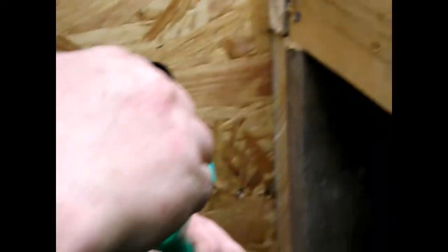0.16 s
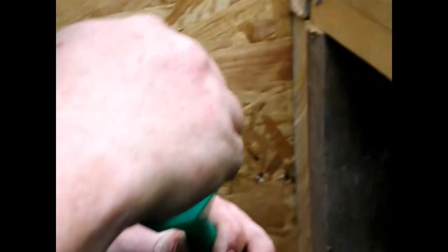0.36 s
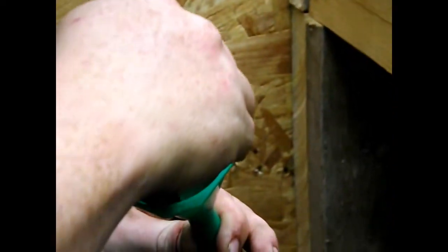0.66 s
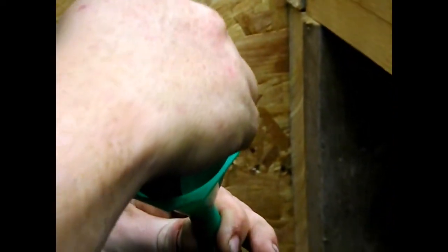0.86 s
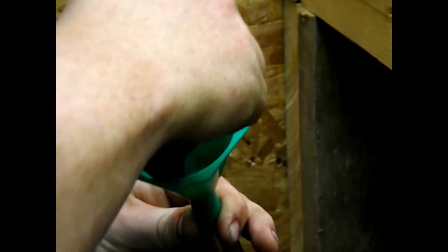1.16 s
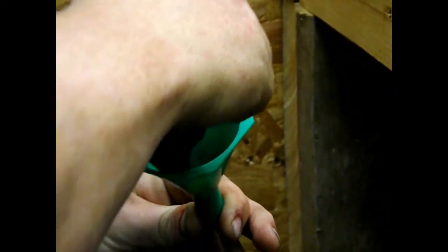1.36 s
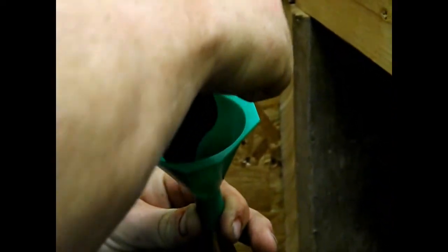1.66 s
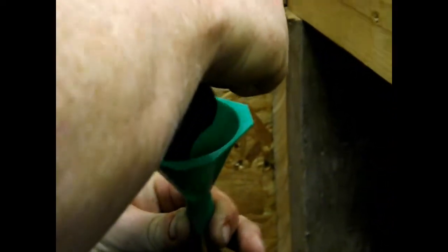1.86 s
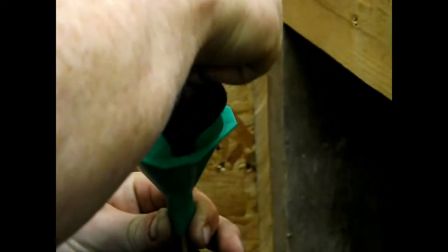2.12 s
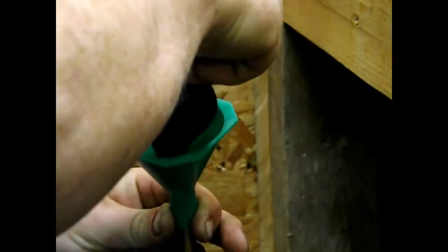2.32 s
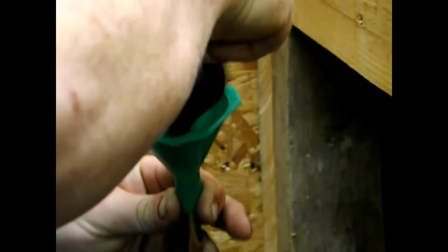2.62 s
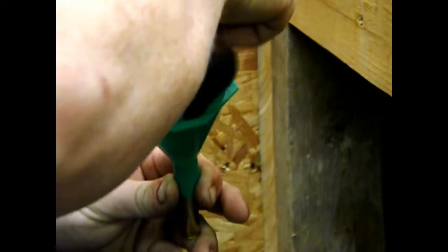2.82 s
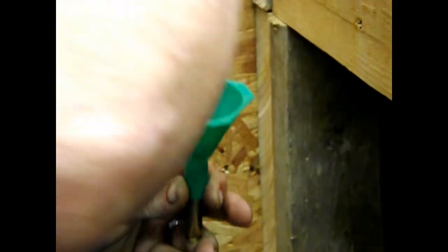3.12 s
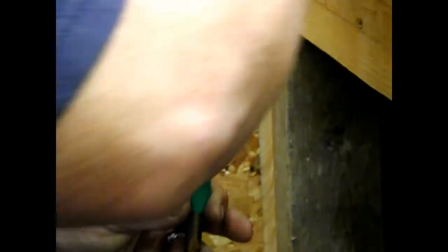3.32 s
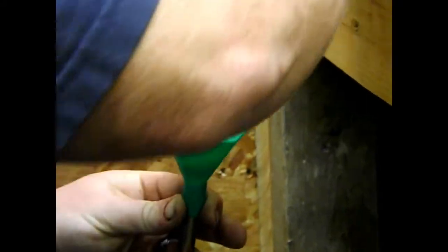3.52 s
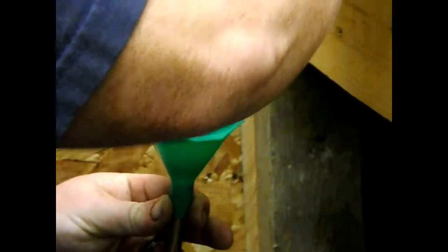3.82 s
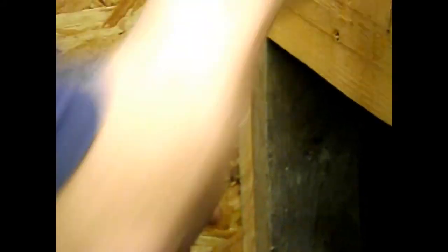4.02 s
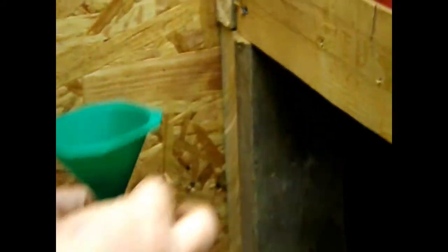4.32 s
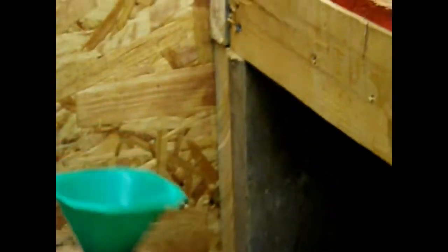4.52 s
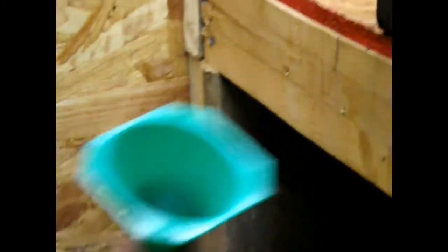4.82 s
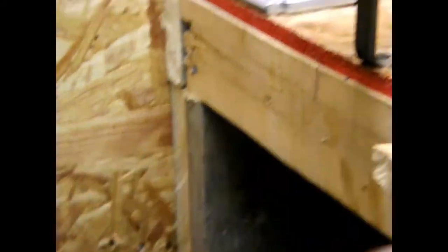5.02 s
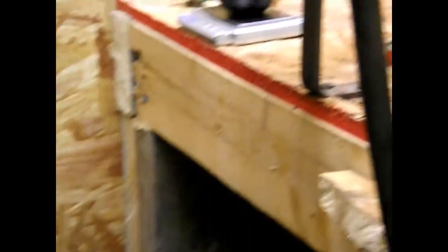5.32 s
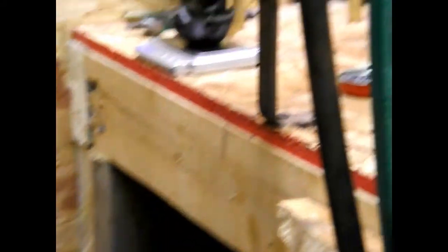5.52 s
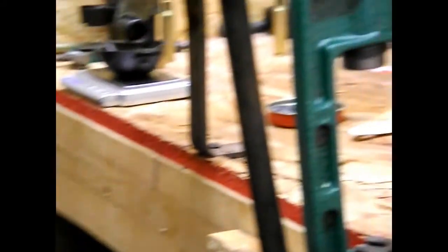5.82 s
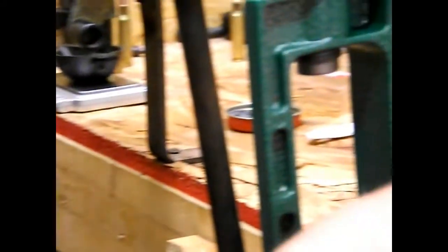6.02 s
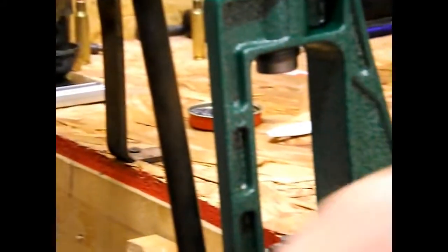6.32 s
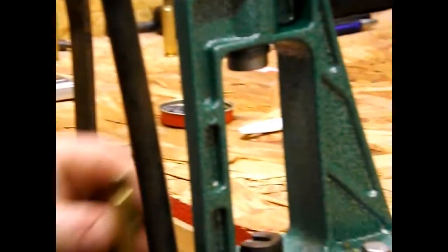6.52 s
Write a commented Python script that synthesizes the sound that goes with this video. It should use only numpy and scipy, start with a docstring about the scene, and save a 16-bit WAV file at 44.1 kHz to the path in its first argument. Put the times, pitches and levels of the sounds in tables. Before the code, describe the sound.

In a small wooden shed, a pan rap-rap-raps a plastic funnel with gritty powder spills, followed by a funnel thud and chattering metal case clinks.

```python
"""First a lamp buzzes over quiet room air and low bumps of hands shifting on the camera.
Then a small pan is tapped on a plastic funnel: each tap is a set of ringing modes, and many tiny
ringing impacts make the powder that rattles down. Later the funnel knocks on the bench and
a brass case slides and clinks in a press. The camera samples at a quarter rate, joins samples
by straight lines and adds a faint early copy; one sample clicks in the right channel."""
import sys
import numpy as np
from scipy import signal
from scipy.fft import rfft, irfft
from scipy.io import wavfile
from scipy.ndimage import uniform_filter1d, minimum_filter1d

SR = 44100
rng = np.random.default_rng(int(sys.argv[2]) if len(sys.argv) > 2 else 0)


def nominal_scale(level):
    """Amplitude ratio for a level in decibels (scalar or array-like)."""
    x = np.asarray(level, float) / 20
    return 10 ** x


def dump_mix(stems):
    """Bounce the given channels to the path in sys.argv[1] as a 16-bit WAV at rate SR."""
    frames = np.atleast_2d(stems).T  # one column per channel
    limited = np.clip(frames, -1, 1)  # hard clip at full scale
    pcm = np.round(limited * 32767).astype(np.int16)
    wavfile.write(sys.argv[1], SR, pcm)


N = 293706  # length in samples

# Taps of the pan on the funnel rim: start_s, blow_db, low_modes_db, middle_modes_db and top_modes_db
# (each relative to the rim's usual balance), powder_db shaken loose, powder_fade_db_per_s
PAN_TAPS = [(1.8019, -1, -4.5, 5, -7, -21.5, 150), (1.8943, -3.5, -1, -3, 1, -31, 70),
            (1.8977, -9.5, -15, 1, -2.5, -31.5, 200), (1.9841, -4.8, 2, -3, 1.5, -23, 180),
            (2.1291, -3, -2, 9, 5, -27, 202), (2.191, -4, 0, -2, -6, -15, 331),
            (2.274, -1.5, 3.5, 2, 1.5, -23, 130), (2.342, -15.5, 8, 3, 9.5, -29, 259),
            (2.4169, .2, 4, 2, 2.5, -20.5, 140), (2.562, 0.4, 5, 2.5, 6.5, -24, 249),
            (2.5981, -9.5, -2, -4, -2.5, -25, 230), (2.703, 1.8, 5, 3, 2.5, -20, 170),
            (2.749, -12, .6, -9, -4, -21.5, 300), (2.8368, -1.5, -0.5, -2, 4.5, -24, 230)]
# How the tapped rim rings: pitch_hz, width_hz (wider dies sooner), relative_db
RIM_MODES = [(600, 110, -44.5), (960, 70, -15.5), (1574, 95, -11.5), (1860, 310, -9), (2743, 596, -4.5),
             (2966, 101, 6.5), (3215, 150, -3.5), (4152, 122, -6), (4734, 170, -10), (5126, 97, -20)]
# How the funnel rings under falling grains: pitch_hz, width_hz, relative_db
FUNNEL_MODES = [(587, 340, -32), (970, 196, -19.5), (1670, 315, -12.5), (2240, 240, -11.5),
                (2642, 79, -3.5), (3020, 197, 0), (3228, 195, -3), (3887, 100, -10.5), (4520, 280, -16),
                (5450, 400, -25)]


def pouring():
    """Sharp taps of the pan, each shaking a gush and then a thinning stream of grains down the funnel."""
    start_s, blow_db, _, middle_db, _, powder_db, fade = np.transpose(PAN_TAPS)
    gush = aftermath(start_s, blow_db - 22, fade_db_per_s=600)
    stream = aftermath(start_s, powder_db, fade)
    # the stream's low modes keep part of the tap's middle tone
    low_stream = aftermath(start_s, powder_db - 12 + 0.4 * middle_db, fade)
    upper = np.hypot(gush, stream)
    lower = np.hypot(nominal_scale(-10.5) * gush, low_stream)
    out = rattle(upper, lower, FUNNEL_MODES, split_hz=2300, per_s=2400, spread_db=3, scatter=0.05)
    hz = np.array(RIM_MODES)[:, :1]
    for start_s, blow_db, low_db, middle_db, top_db, _, _ in PAN_TAPS:
        # modes from 2300 to 3600 Hz keep their usual balance
        shade_db = np.select([hz < 1200, hz < 2300, hz > 3600], [low_db, middle_db, top_db])
        add(out, start_s, nominal_scale(blow_db) * ring(RIM_MODES, 0.021, shade_db))
    return out


# Knocks of the funnel on the bench: start_s, knock_db, wobble_db of the rattle that follows
FUNNEL_KNOCKS = [(5.191, -35, -39), (5.229, -12, -29.5), (5.261, -30, -29.5), (5.299, -25, -36)]
# How the bench rings: pitch_hz, width_hz, relative_db
BENCH_MODES = [(284, 49, 0.5), (336, 32, 1), (478, 52, -3.5), (605, 120, -11), (842, 84, -5.5),
               (1032, 117, -8.5), (1520, 270, -23), (2100, 400, -29.5)]


def funnel_down():
    """The light funnel lands, rocks and scrapes on the wood; each knock is a short dull thud."""
    start_s, _, wobble_db = np.transpose(FUNNEL_KNOCKS)
    wobble = aftermath(start_s, wobble_db, fade_db_per_s=223)
    out = rattle(wobble, nominal_scale(-1.5) * wobble, BENCH_MODES,
                 split_hz=550, per_s=1700, spread_db=1.5, scatter=0.059)
    knock_modes = BENCH_MODES + [(715, 130, 2.1)]  # only the knocks sound this extra mode
    for start_s, knock_db, _ in FUNNEL_KNOCKS:
        add(out, start_s, nominal_scale(knock_db) * ring(knock_modes, 0.027, contact_s=0.0001))
    return out


# Clinks of the case in the press: start_s, clink_db, low_modes_db relative to the usual balance,
# chatter_db of the rattle that follows, chatter_fade_db_per_s
CASE_CLINKS = [(5.642, -41, 5, -52, 150), (5.7304, -20, 19.5, -30, 200), (5.8074, -12, 2, -25, 149),
               (5.8108, -16.5, -8, -34, 200), (5.848, -11, -4, -28.5, 300), (5.8688, -12, -4, -29, 290),
               (5.9479, -20, -10, -33, 200), (5.992, -14, 1.5, -27, 279), (6.034, -22, 2, -38, 300)]
# How the case rings: pitch_hz, width_hz, relative_db
BRASS_MODES = [(916, 680, -33), (1230, 60, -21.5), (1577, 100, -14), (2167, 83, -9.5), (2750, 270, -8),
               (3088, 86, 3), (3430, 127, 0.5), (4170, 450, -15), (5040, 490, -22.5)]


def case_clinks():
    """The brass case clinks and chatters against steel: single blows, each followed by small impacts."""
    start_s, _, low_db, chatter_db, fade = np.transpose(CASE_CLINKS)
    upper = aftermath(start_s, chatter_db, fade)
    # the chatter's low modes keep part of the clink's own balance
    lower = aftermath(start_s, chatter_db - 17 + 0.31 * low_db, fade)
    out = rattle(upper, lower, BRASS_MODES, split_hz=2400, per_s=1900, spread_db=3, scatter=0.028)
    is_low = np.array(BRASS_MODES)[:, :1] < 2000
    for start_s, clink_db, low_db, _, _ in CASE_CLINKS:
        add(out, start_s, nominal_scale(clink_db) * ring(BRASS_MODES, 0.0082, low_db * is_low, contact_s=0.00024))
    return out


# The case's one slide along the steel: peak_s, level_db, rise_db_per_s, fall_db_per_s
CASE_SLIDE = (5.648, -44, 300, 50)
# How the slide rasps: pitch_hz, width_hz, relative_db
RASP_MODES = [(2200, 350, -2), (2750, 400, -3), (3300, 450, -1), (3800, 400, -9)]


def case_slide():
    """The case first slides along the steel: a swell of small rasping impacts."""
    return grains(swells(*CASE_SLIDE), RASP_MODES, per_s=1500, spread_db=3.5, scatter=0.06)


# Faint sliding of powder and sleeve: peak_s, level_db, rise_db_per_s, fall_db_per_s
RUSTLE_SWELLS = [(1.604, -50.5, 189.5, 110), (1.76, -55, 300, 500), (4.485, -67, 900, 160),
                 (5.13, -51.5, 67, 200), (5.254, -43.5, 200, 120)]
# Colour of the rustle: pitch_hz, width_hz, relative_db
RUSTLE_MODES = [(1880, 670, -9), (2700, 1300, -5), (3350, 290, 4.5), (3750, 430, -1), (4230, 900, -5)]


def rustle():
    """Powder and sleeve slide faintly: dense tiny impacts that blur into a swish."""
    gain = swells(*np.transpose(RUSTLE_SWELLS))
    return grains(gain, RUSTLE_MODES, per_s=5100, spread_db=3.5, scatter=0.039)


# A little powder running down the neck: peak_s, level_db, rise_db_per_s, fall_db_per_s
TRICKLE_SWELLS = [(1.62, -52, 169, 36), (1.771, -36.5, 700, 1500), (3.48, -57, 300, 150),
                  (3.62, -55.5, 150, 40), (3.75, -56.5, 51, 70)]
# How the neck rings: pitch_hz, width_hz, relative_db
NECK_MODES = [(3200, 46, 20), (3400, 250, -15.5)]


def trickle():
    """A little powder trickles down the neck: sparser grains, each making the narrow neck ring."""
    gain = swells(*np.transpose(TRICKLE_SWELLS))
    return grains(gain, NECK_MODES, per_s=600, spread_db=3, scatter=0.019)


# Small dull ticks and bumps; the 5.233 s row is the bench's low thud under the funnel's hardest knock:
# start_s, level_db, pitch_hz, width_hz
TICKS_AND_THUD = [(3.062, -39, 1090, 110), (3.063, -46, 1800, 300), (3.585, -51, 1500, 70),
                  (3.6, -47, 275, 9), (4.5, -39, 3350, 300), (4.511, -40, 1840, 250),
                  (4.528, -51, 2000, 300), (4.545, -44, 2100, 300), (5.233, -38.5, 104.4, 13)]


def ticks_and_thud():
    """Dull ticks and a low thud: a main mode and a weaker, faster-dying one above, with a slow contact."""
    out = np.zeros(N)
    for start_s, level_db, hz, width in TICKS_AND_THUD:
        modes = [(hz, width, 0), (hz * 1.8, width * 3, -10)]
        add(out, start_s, nominal_scale(level_db) * ring(modes, 0.011, contact_s=0.002))
    return out


# Tones of the lamp: rough pitch_hz (moved to the nearest harmonic of the buzz), level_db (rms)
LAMP_TONES = [(1082, -69), (1200, -74.5), (1319, -76), (1561, -64), (1680, -65.5), (1916, -70.5),
              (2277, -67.5), (2401, -72), (2519, -67), (2638, -62.5), (2756, -61.5), (2821, -77.5),
              (2880, -61.5), (2998, -57.5), (3117, -56.5), (3241, -63), (3478, -76), (3849, -92),
              (4081, -79.5)]


def lamp():
    """Buzz at twice the mains rate: each cycle a short upward sweep and a weaker second stroke, drifting."""
    buzz_hz = 119.94
    sweep_s_per_hz = 2.5e-6  # higher tones come later within each cycle
    second_stroke = 0.28  # relative size of the stroke half a cycle later
    t = np.arange(N) / SR
    drift = np.zeros(N)
    for hz in np.geomspace(0.1, 6, 20):
        drift += np.sin(2 * np.pi * (hz * t + rng.random())) / np.sqrt(hz)
    turns = buzz_hz * t + 0.0022 * evened(drift)  # cycles of the buzz so far
    out = np.zeros(N)
    for hz, level_db in LAMP_TONES:
        k = round(hz / buzz_hz)
        stroke_phase = (-1) ** k * np.arctan(second_stroke)
        sweep_phase = -np.pi * sweep_s_per_hz * (k * buzz_hz) ** 2
        tone = np.cos(2 * np.pi * k * turns + stroke_phase + sweep_phase)
        out += nominal_scale(level_db) * np.sqrt(2) * tone
    return out


# Hands shifting on the camera: peak_s, level_db, rise_db_per_s, fall_db_per_s
HAND_BUMPS = [(0.0, -44.5, 100, 97), (0.799, -32, 153, 100), (1.12, -52, 100, 102), (1.4, -34, 300, 150),
              (1.56, -47.5, 100, 69), (2.11, -30.5, 299, 82), (2.791, -30.5, 199, 252), (2.94, -38, 79, 58),
              (3.44, -46.5, 150, 122), (3.6, -55, 80, 41), (5.27, -50, 70, 25)]


def hands_on_camera():
    """Hands on the camera: very low noise with a lumpy, always present level and added bumps."""
    lumps = evened(uniform_filter1d(rng.standard_normal(N), size=5000))
    gain = nominal_scale(-60 + 4 * lumps) + swells(*np.transpose(HAND_BUMPS))
    return gain * coloured([(3, -11), (12, 7), (25, -4), (45, -12), (80, -40), (300, -89)])


# Fuzzy low drones: pitch_hz, width_hz, level_db (rms)
LOW_DRONES = [(120.3, 11, -73.5), (471, 3.2, -73)]


def drones():
    """Low drones: noise squeezed into narrow bands, so each has a blurred pitch."""
    out = np.zeros(N)
    for hz, width, level_db in LOW_DRONES:
        band = [(hz - 3 * width, -60), (hz - width, -8), (hz, 0), (hz + width, -8), (hz + 3 * width, -60)]
        out += nominal_scale(level_db) * coloured(band)
    return out


# Colour of the room air: pitch_hz, relative_db
AIR_COLOUR = [(40, -5.5), (90, -11), (300, -16), (700, -21), (1100, -17.5), (2000, -21), (3000, -15),
              (3600, -18), (4500, -22), (5500, -22.5)]


def room_air():
    """Room air: steady noise with a fixed colour."""
    return nominal_scale(-54) * coloured(AIR_COLOUR)


def shed(x, t60=0.31):
    """Sparse echoes of random sign from close wooden walls, falling 60 dB in t60 seconds."""
    at = np.arange(150, SR // 2, 20)
    taps = np.zeros(SR // 2 + 20)
    sign = rng.choice([-1., 1.], len(at))
    taps[at + rng.integers(0, 20, len(at))] = sign * nominal_scale(-60 * at / SR / t60)
    return signal.oaconvolve(x, taps / np.linalg.norm(taps))[:N]


def evened(x):
    """Scales to an rms of 1."""
    return x / np.sqrt(np.mean(x ** 2) + 1e-20)


def add(mix, start_s, sound):
    """Mixes a sound in at start_s, cut off at the end of the mix."""
    part = mix[round(start_s * SR):][:len(sound)]
    part += sound[:len(part)]


def ring(modes, scatter, shade_db=0, contact_s=0.00005):
    """One blow: decaying modes, slightly detuned, softened by the contact time; peak 1."""
    hz, width, db = np.transpose(modes)[:, :, None]
    t = np.arange(3000) / SR
    hz = hz * (1 + scatter * rng.standard_normal((len(modes), 1)))
    sign = (-1.) ** np.arange(len(modes))[:, None]  # neighbouring modes swing against each other
    strength = sign * nominal_scale(db + shade_db) * width
    sound = (strength * np.exp(-np.pi * width * t) * np.sin(2 * np.pi * hz * t)).sum(0)
    sound *= 1 - np.exp(-t / contact_s)
    no_bass = signal.butter(3, 0.64 * hz.min(), "high", fs=SR, output="sos")  # small things radiate no bass
    sound = signal.sosfilt(no_bass, sound)
    return sound / abs(sound).max()


def grains(gain, modes, per_s, spread_db, scatter, count=24):
    """Many small impacts of uneven size, each ringing a slightly different patch of the body."""
    happens = rng.random(N) < per_s / SR
    size = nominal_scale(spread_db * np.minimum(rng.exponential(1, N), 4)) * happens
    size *= rng.choice([-1., 1.], N)
    patch = rng.integers(0, count, N)
    bodies = [ring(modes, scatter) for k in range(count)]
    body_energy = np.mean(np.sum(np.square(bodies), 1))
    power = per_s / SR * np.mean(size[size != 0] ** 2) * body_energy
    # work only from the first to the last moment with gain above -100 dB
    live = slice(np.argmax(gain > 1e-5), N - np.argmax(gain[::-1] > 1e-5))
    out = np.zeros(N)
    for k, body in enumerate(bodies):
        hits = (gain * size * (patch == k))[live]
        add(out, live.start / SR, signal.oaconvolve(hits, body))
    return out / np.sqrt(power)


def rattle(upper, lower, modes, split_hz, **shape):
    """Grains whose upper and lower modes follow their own gains."""
    high = grains(upper, [m for m in modes if m[0] > split_hz], **shape)
    return high + grains(lower, [m for m in modes if m[0] <= split_hz], **shape)


def coloured(points):
    """Steady noise of rms 1 whose spectrum follows points of (pitch_hz, relative_db)."""
    point_hz, db = np.transpose(points)
    hz = np.fft.rfftfreq(N, 1 / SR)
    curve = nominal_scale(np.interp(np.log(hz + 1), np.log(point_hz), db))
    return evened(irfft(rfft(rng.standard_normal(N)) * curve, N))


def swells(peak_s, level_db, rise_db_per_s, fall_db_per_s):
    """Gain over time: each swell climbs to its peak and dies away, straight in dB; powers add."""
    power = np.zeros(N // 32 + 2)  # one value every 32 samples
    t = np.arange(len(power)) * 32 / SR
    for at, top_db, up, down in np.broadcast(peak_s, level_db, rise_db_per_s, fall_db_per_s):
        below_db = abs(up) * np.maximum(at - t, 0) + abs(down) * np.maximum(t - at, 0)
        power += nominal_scale(2 * (top_db - below_db))
    return np.interp(np.arange(N) / SR, t, np.sqrt(power))


def aftermath(start_s, level_db, fade_db_per_s):
    """Gain of the rattle that each blow sets going: it peaks 7.4 ms after the blow and then fades."""
    return swells(start_s + 0.0074, level_db, 3001, fade_db_per_s)


def scene():
    """One microphone, so both channels carry the same sound; only the near sounds echo in the shed."""
    near = pouring() + funnel_down() + case_clinks() + case_slide() + rustle() + trickle() + ticks_and_thud()
    mono = near + nominal_scale(-11) * shed(near) + lamp() + hands_on_camera() + drones() + room_air()
    return np.array([mono, mono])


def quarter_rate(x):
    """Samples at a quarter rate with soft overload; straight-line joining leaves mirror bands above."""
    slow = signal.sosfilt(signal.cheby2(14, 40, 5800, fs=SR, output="sos"), x)
    slow = slow / (1 + abs(slow / 1.05) ** 8) ** (1 / 8)
    slow = slow * (np.arange(N) % 4 == 0)
    hz = np.fft.rfftfreq(N, 1 / SR)
    return irfft(rfft(slow) * 4 * np.sinc(hz * 4 / SR) ** 2, N)  # sinc squared: straight lines


def early_copy(x):
    """The same sound 768 samples ahead; its gain control turns it down when it is loud."""
    quiet_share, loud_share, knee_db = 0.53, 0.21, -24
    release_db_per_s = 100.5  # how fast the gain control lets go
    peak_db = 20 * np.log10(-minimum_filter1d(-abs(x), size=201) + 1e-9)
    fall = np.arange(N) * release_db_per_s / SR
    held = nominal_scale(np.maximum.accumulate(peak_db + fall, axis=1) - fall - knee_db)
    share = loud_share + (quiet_share - loud_share) / (1 + held ** 2)
    return np.roll(uniform_filter1d(share, size=101) * x, -768, axis=1)


def flipped_sample(x):
    """One click at about 2.704 s: the lowest right-channel sample in a short fixed window flips upward."""
    start = round(2.7038 * SR)
    lowest = start + np.argmin(x[1, start:start + 60])
    x[1, lowest] *= -0.8
    return x


def low_pass(x):
    """Removes everything above the highest recorded frequency."""
    return signal.sosfilt(signal.butter(12, 16850, fs=SR, output="sos"), x)


def record(dry):
    """The camera's sound path: quarter-rate sampling, the early copy, then one flipped sample."""
    joined = quarter_rate(dry)
    out = flipped_sample(joined + early_copy(joined))
    return low_pass(out)


dry = scene()
out = record(dry)
dump_mix(out)
```